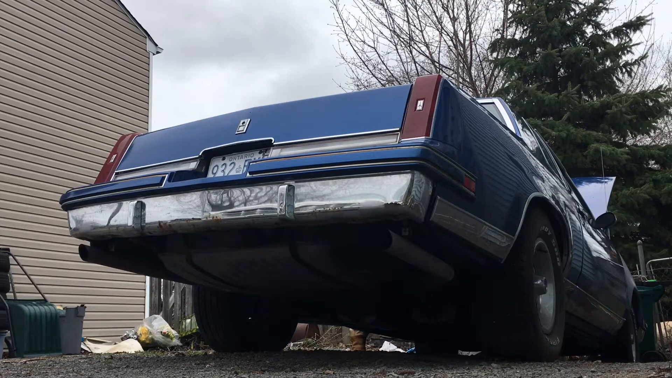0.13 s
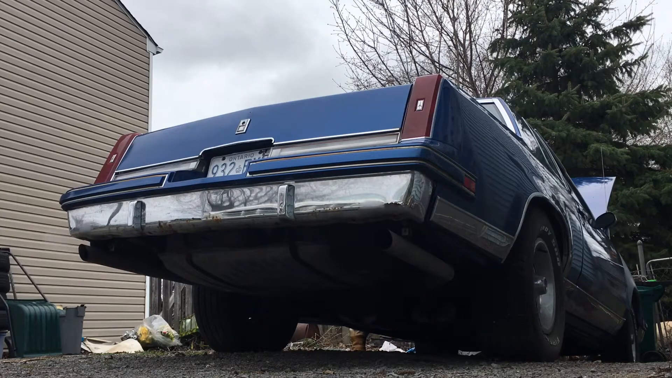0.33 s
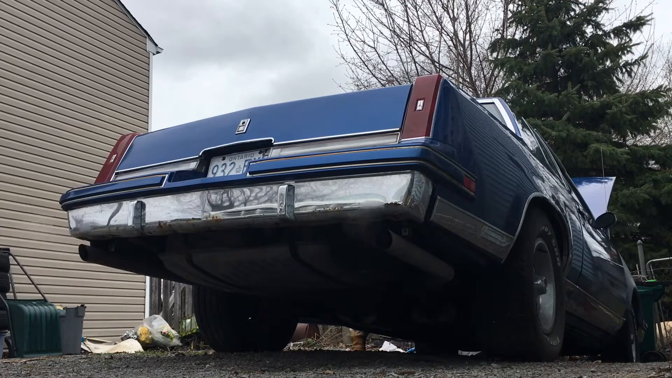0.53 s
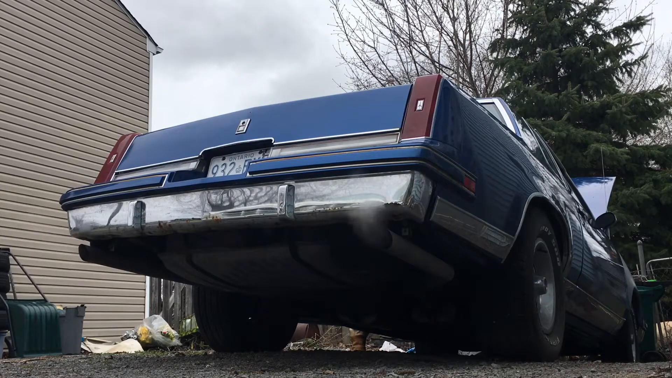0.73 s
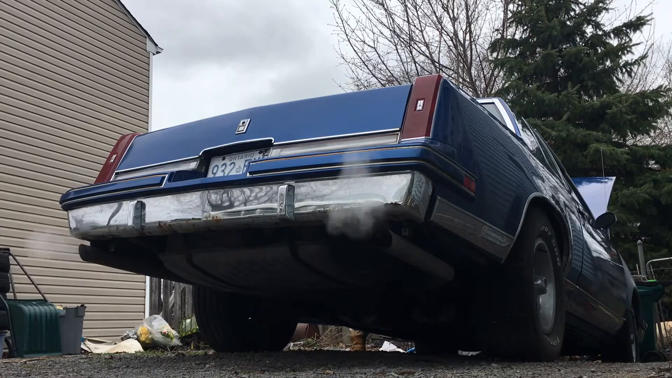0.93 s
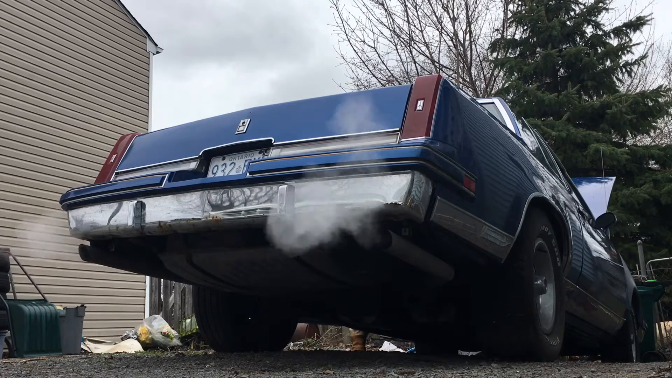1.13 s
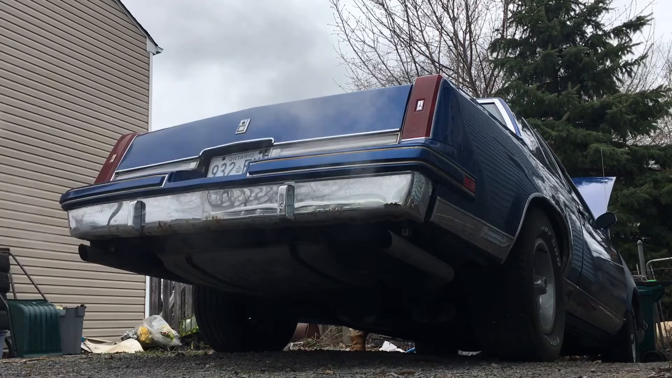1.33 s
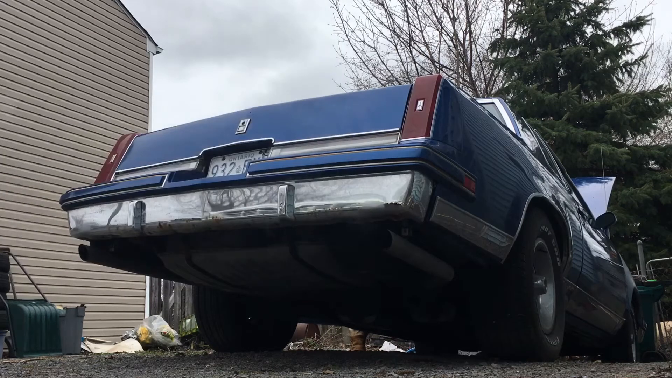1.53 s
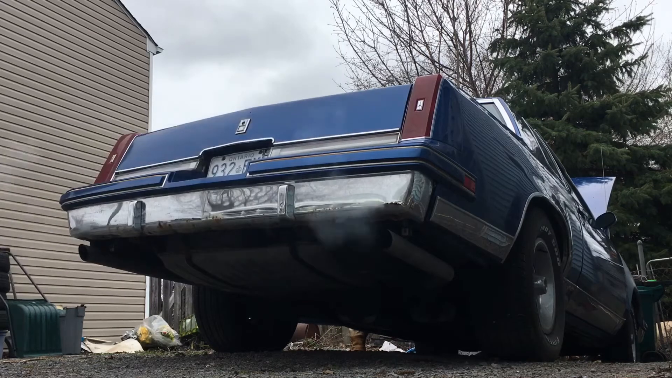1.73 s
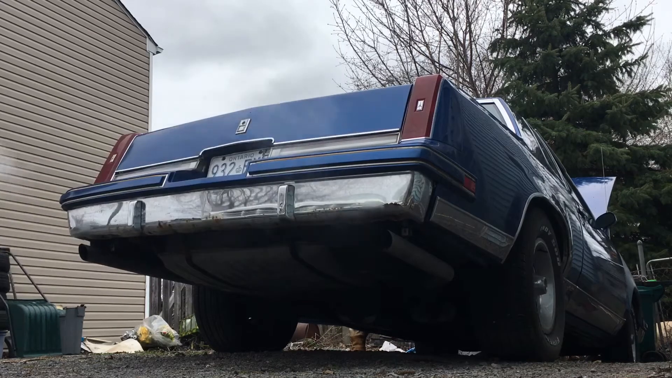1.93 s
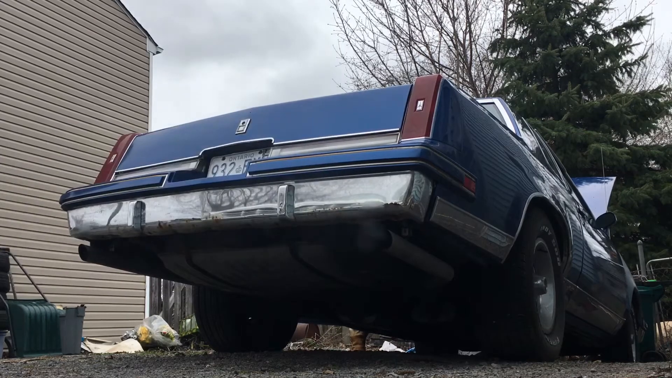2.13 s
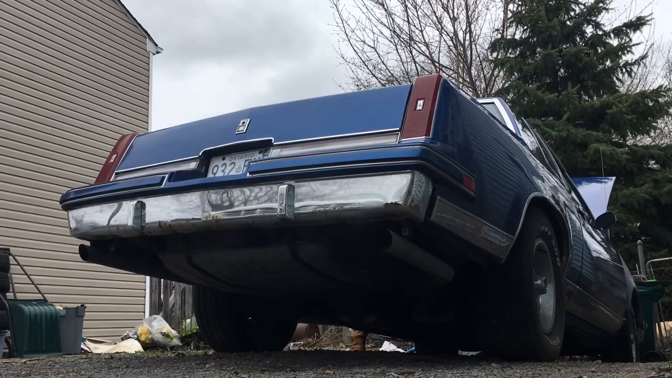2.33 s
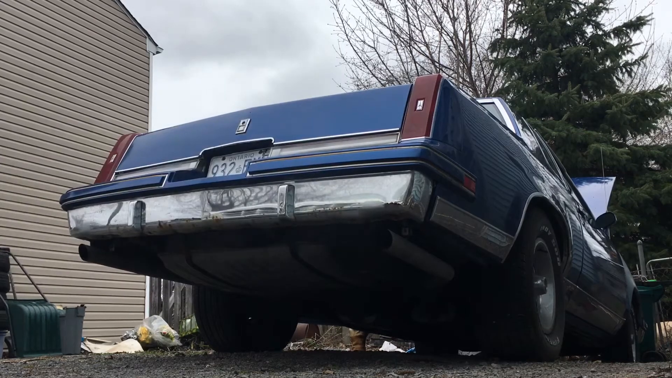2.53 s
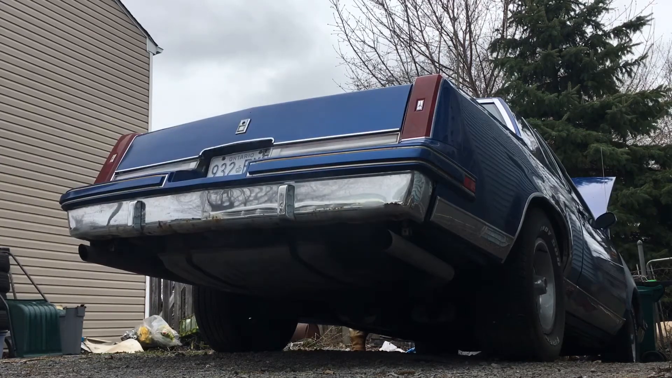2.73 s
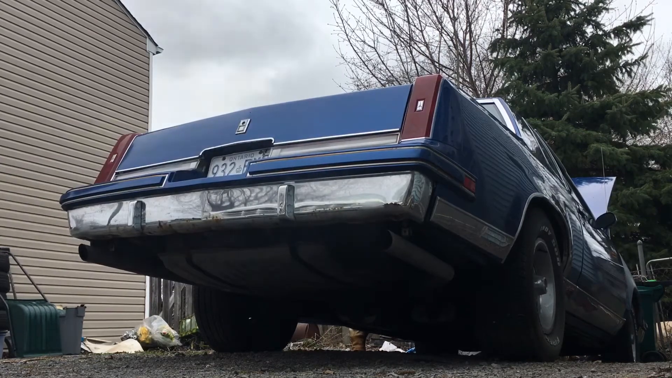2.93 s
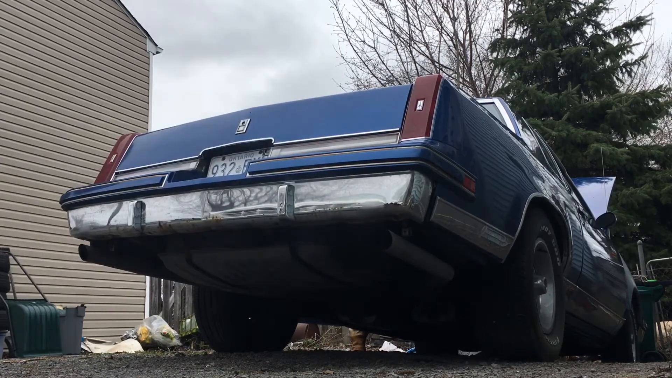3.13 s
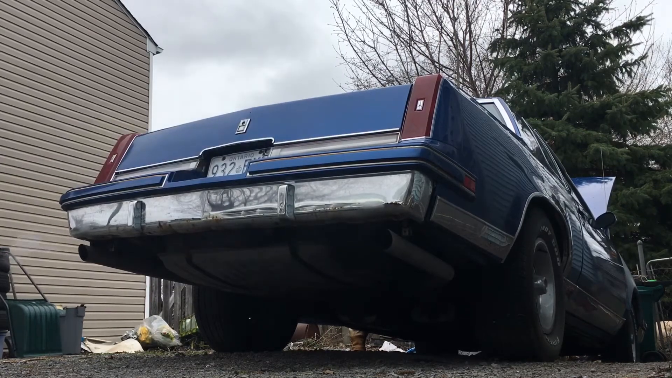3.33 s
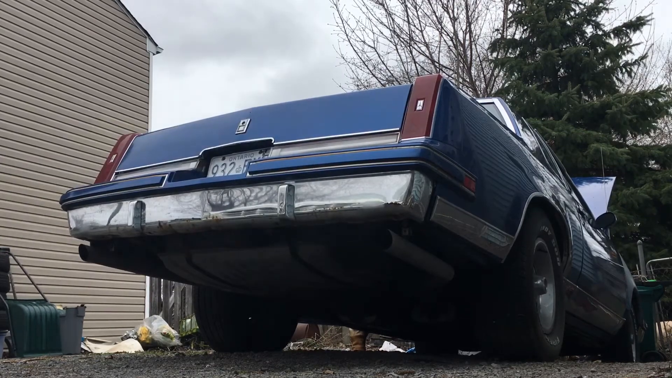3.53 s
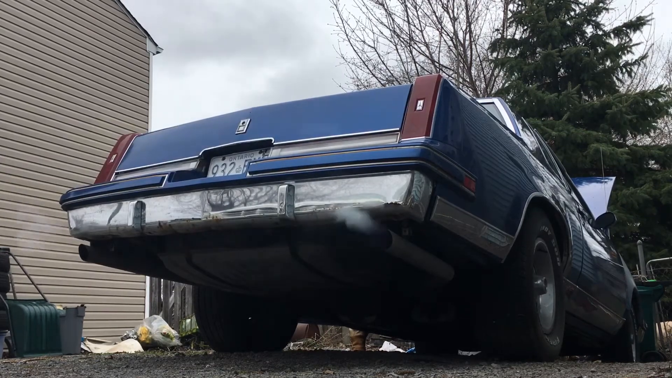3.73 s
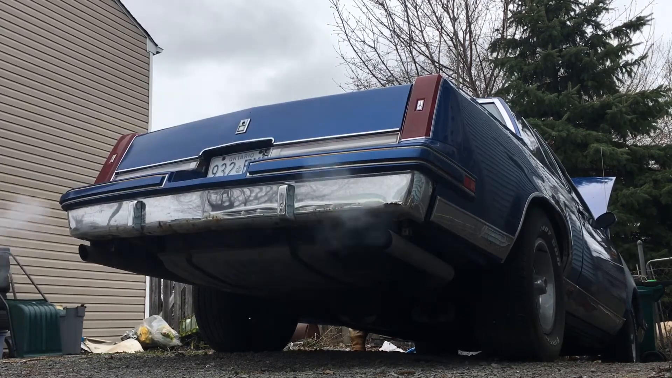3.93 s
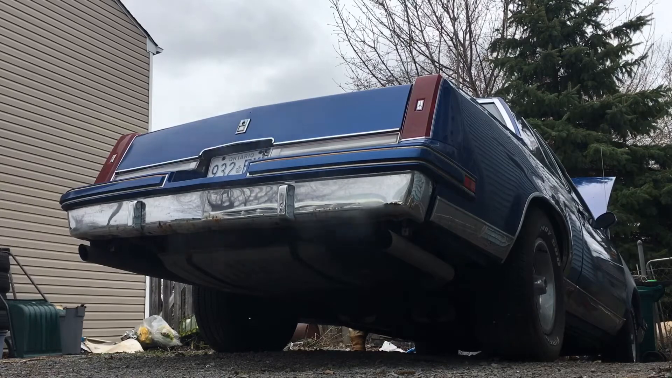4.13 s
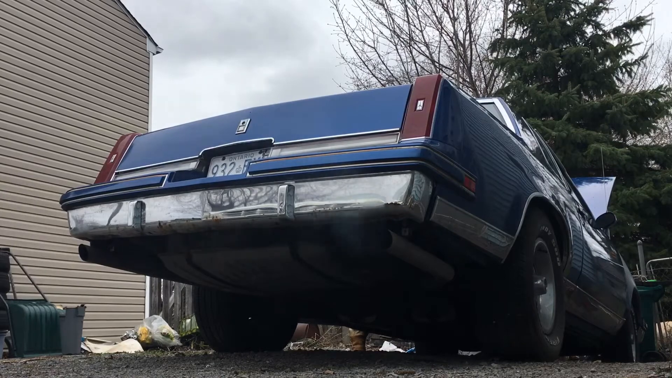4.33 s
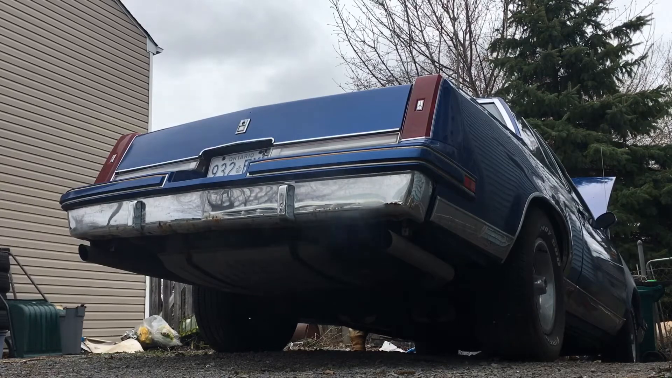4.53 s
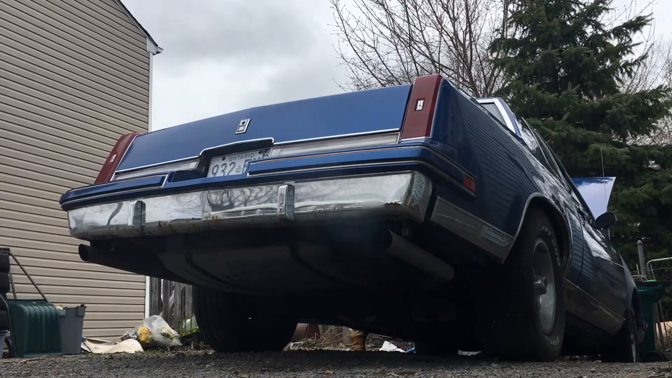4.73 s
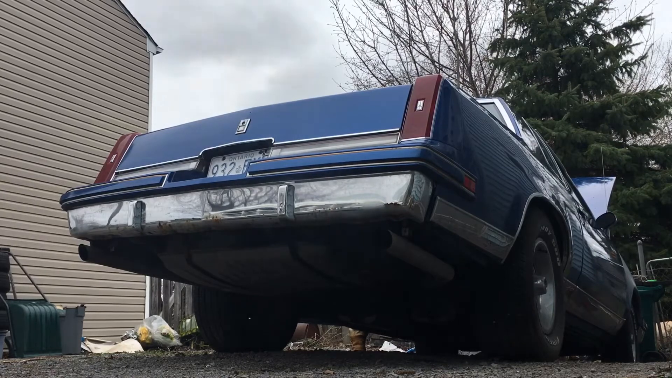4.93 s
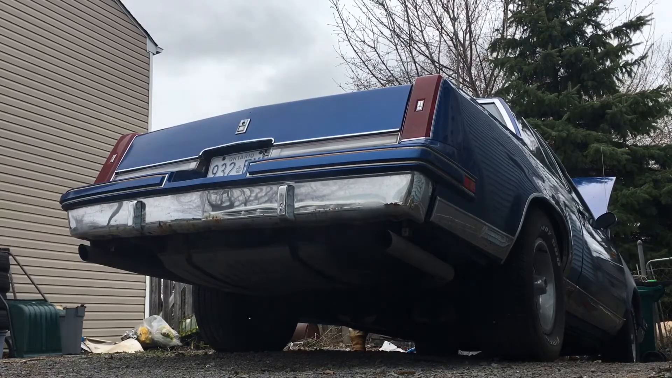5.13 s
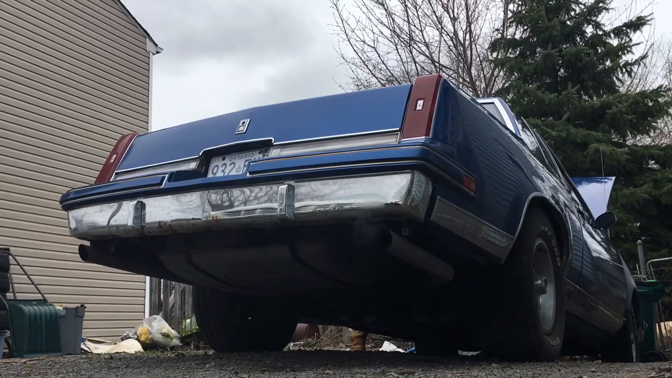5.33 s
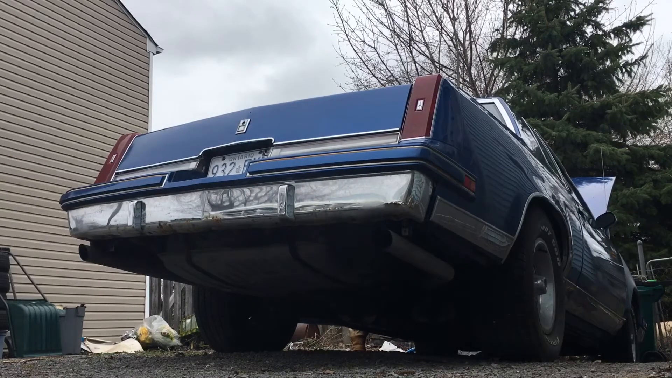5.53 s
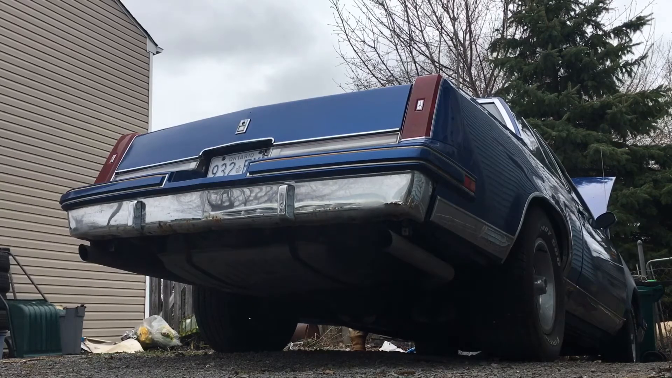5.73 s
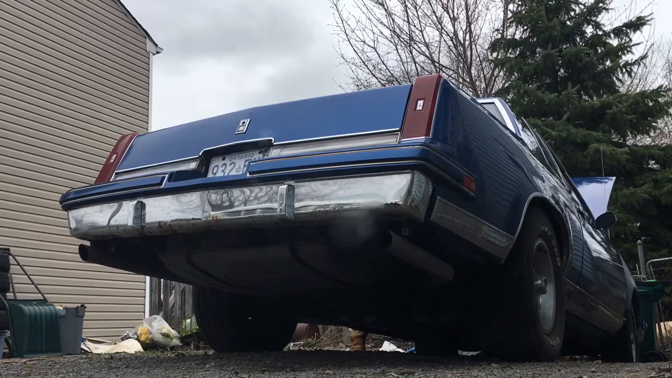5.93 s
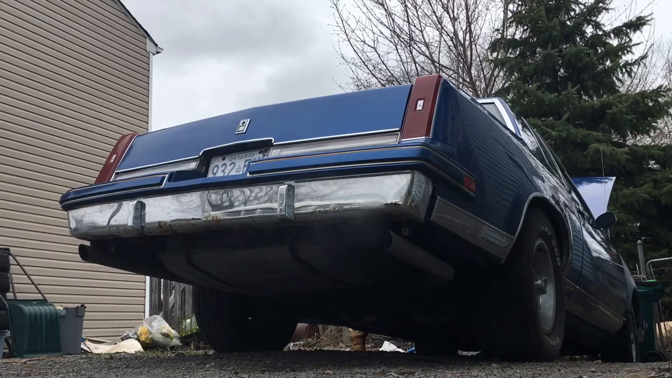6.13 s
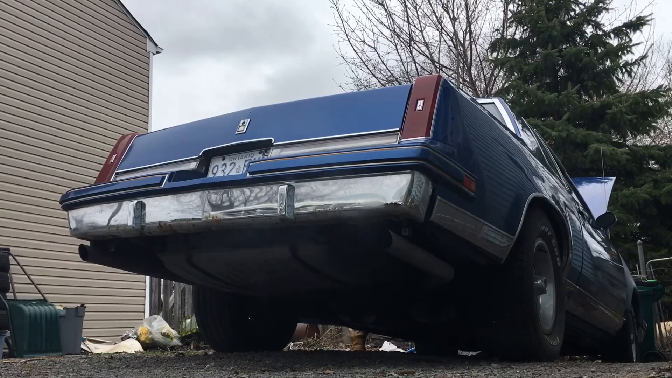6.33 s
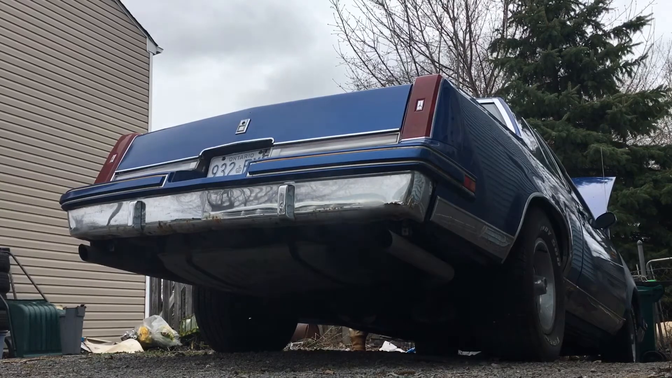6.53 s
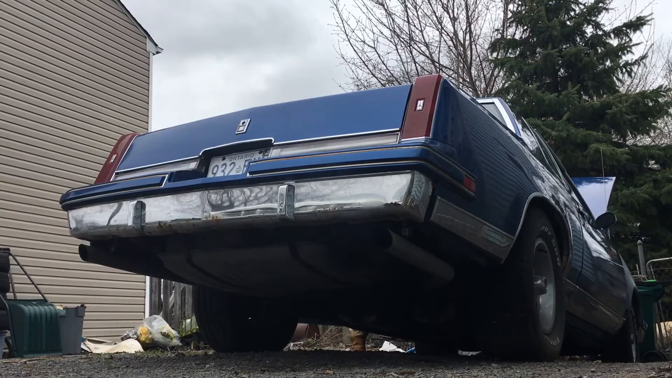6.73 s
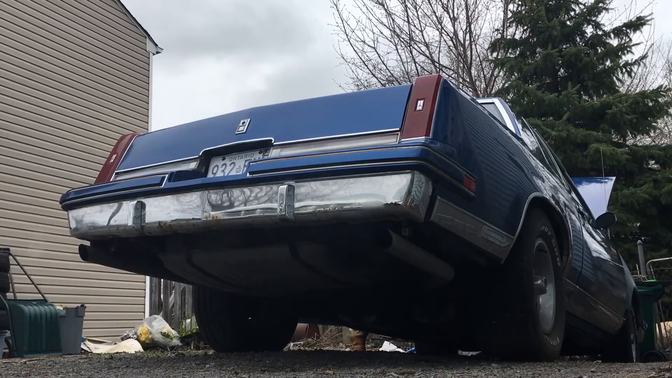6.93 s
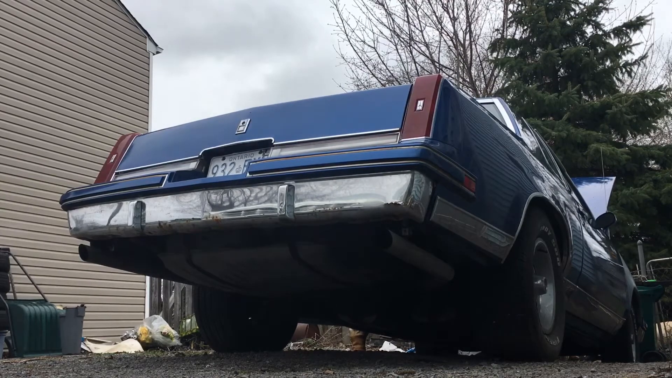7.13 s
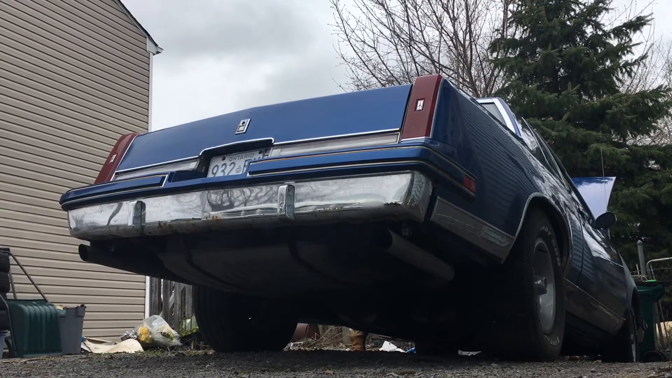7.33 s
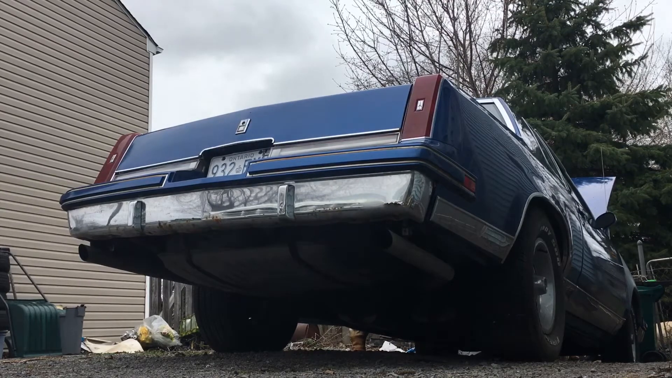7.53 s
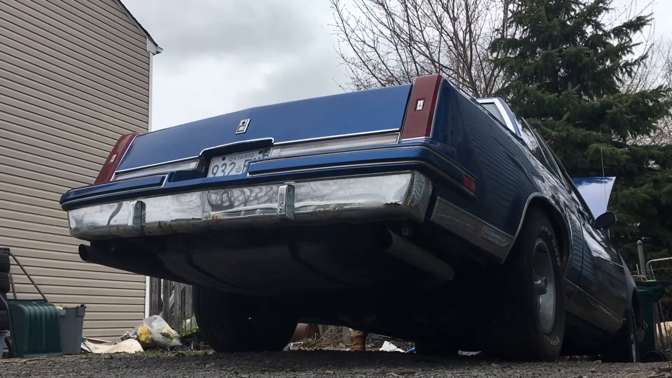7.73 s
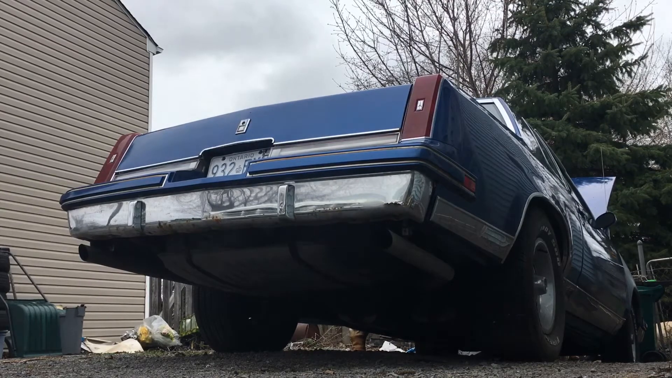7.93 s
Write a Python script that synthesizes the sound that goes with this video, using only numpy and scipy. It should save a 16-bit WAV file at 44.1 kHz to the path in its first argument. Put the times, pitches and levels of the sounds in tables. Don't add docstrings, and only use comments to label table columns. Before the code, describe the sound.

A starter whines and chuffs, then a big open-piped V8 catches with a roar, is blipped several times, crackles and settles into a rough lope.

```python
import sys
import numpy as np
from scipy import signal
from scipy.fft import rfft, irfft
from scipy.io import wavfile
from scipy.ndimage import uniform_filter1d

SR = 44100
rng = np.random.default_rng(int(sys.argv[2]) if len(sys.argv) > 2 else 0)


def log_audio(samples):
    frames = np.atleast_2d(samples).T
    limited = np.clip(frames, -1, 1)
    pcm = np.round(limited * 32767).astype(np.int16)
    wavfile.write(sys.argv[1], SR, pcm)


def magnitude_from_level(level_db):
    exponent = np.asarray(level_db, float) / 20
    return 10 ** exponent


N = 352800
TIME_S = np.arange(N) / SR
CATCH_S, STARTER_OFF_S = 1.13, 1.4
QUIET_DB = -42.5


def level(x, db=0):
    return x * magnitude_from_level(db) / np.sqrt(np.mean(x ** 2))


def columns(table):
    s, *cols = np.transpose(table)
    return [np.interp(TIME_S, s, c) for c in cols]


def ring(x, modes):
    return sum(magnitude_from_level(db) * signal.lfilter(*signal.iirpeak(hz, hz / width, fs=SR), x)
               for hz, width, db in modes)


def colour(x, spectrum):
    hz, db = np.transpose(spectrum)
    f = np.arange(N // 2 + 1) * SR / N + 1
    return irfft(rfft(x) * magnitude_from_level(np.interp(np.log(f), np.log(hz), db)), N)


def band(x, lo_hz, hi_hz):
    return signal.sosfilt(signal.butter(2, [lo_hz, hi_hz], "bandpass", fs=SR, output="sos"), x)


def fade(x, s):
    return signal.lfilter([1], [1, -np.exp(-1 / (s * SR))], x)


def train(times, sizes):
    out = np.zeros(N)
    np.add.at(out, np.clip((np.asarray(times) * SR).astype(int), 0, N - 1), sizes)
    return out


def noise():
    return rng.standard_normal(N)


def bumps(rows):
    return sum(size * np.exp(-((TIME_S - s) / length) ** 2) for s, size, length in rows)


def engine():
    boom_db, bark_db, rasp_db, jet_db = levels()
    flutter_db = 1.7 * level(band(noise(), 6.1, 43.5))
    rasp_db, jet_db = rasp_db + flutter_db, jet_db + flutter_db
    running = np.clip((TIME_S - CATCH_S) / 0.1, 0, 1)
    push, front = firings(jitter_s=.00008, far_db=-8., far_s=.0033)
    throttle = np.clip((rasp_db + 42) / 18, 0, 1)
    spurt = np.maximum(throttle, .3) * level(fade(front, .0015))
    pipes = magnitude_from_level(boom_db) * (boom(push, front) + thuds()) + magnitude_from_level(bark_db) * bark(front)
    gas = magnitude_from_level(rasp_db) * (rasp(spurt) + tear(throttle, spurt)) + magnitude_from_level(jet_db) * jet(throttle, front)
    return running * (pipes + gas)


# bank, charge_db, manifold_travel_ms
CYLINDERS = [(0, 1.5, .8), (1, 1, .3), (1, 1.2, -.4), (0, -.2, 0), (1, -1, .6), (0, -1, 1.6),
             (0, -1.6, -.8), (1, .2, -.2)]


def firings(jitter_s, far_db, far_s):
    hz, scatter_db = crank()
    at = np.flatnonzero(np.diff(np.floor(np.cumsum(len(CYLINDERS) * hz / SR))))
    bank, charge_db, travel_ms = np.array(CYLINDERS)[np.arange(len(at)) % len(CYLINDERS)].T
    chance = rng.standard_normal((N // 100, 2))[:len(at)].T * scatter_db[at]
    sizes = magnitude_from_level(charge_db + bank * far_db + chance[0]) / np.sqrt(hz[at])
    times = at / SR + bank * far_s + jitter_s * chance[1]
    return level(train(times, sizes)), level(train(times + travel_ms / 1e3, sizes))


# pitch_hz, width_hz, level_db
BOOM = [(48, 30, -17), (72, 36, -11), (108, 26, 0), (185, 40, -21)]


def boom(push, front):
    low = level(sum(ring(ring(-push, [mode]), [mode[:2] + (0,)]) for mode in BOOM))
    low = low + level(ring(ring(-front, [(199.4, 75, 0)]), [(196.5, 94, 0)]), -7.5)
    return low - .8 * ring(low, [(152, 40, 0)])


# centre_s, strength, length_s
THUDS = [
    (1.27, 1.3, 0.22),
    (1.62, 0.5, .04),
    (2.05, 0.7, 0.1),
    (4.96, .6, 0.036),
    (5.11, 1, 0.085),
    (7.9, 0.46, .1),
]


def thuds():
    return bumps(THUDS) * level(band(noise(), 47, 110), 0.5)


# pitch_hz, width_hz, level_db
BARK = [(221.5, 60, -3), (239.5, 98, -5), (283, 15.6, -5), (310.4, 14.2, 1.1), (421, 49.5, -3),
        (523, 33, -6.5), (624.5, 48, 1), (756, 22, -6.5), (885, 89, -15)]


def bark(front):
    gas = .24 * (.8 + level(fade(front, .004))) * noise()
    soft = signal.lfilter(*signal.butter(2, 450, fs=SR), front)
    return level(band(band(ring(gas - soft, BARK), 175, 1100), 150, 1200))


# pitch_hz, width_hz, level_db
RASP = [(1280, 170, -21), (2273, 455, 15), (2456, 320, 11), (2570, 110, 1), (3870, 900, -37),
        (4070, 710, -30)]


def rasp(spurt):
    return level(band(ring((1.74 + spurt) * noise(), RASP), 1070, 3750), -1.0)


# pitch_hz, width_hz, level_db
TEAR = [(990, 490, 1), (3363, 1500, 0)]


def tear(throttle, spurt):
    strength = throttle ** 1.9 * np.clip(crank()[0] / 23.5, 0, 1) ** 2
    return strength * level(band(ring((0.63 + spurt) * noise(), TEAR), 630, 2930), 0.1)


# pitch_hz, level_db
JET = [(3180, -15), (5400, -6.5), (5730, -4), (7220, -8.5), (9190, -6), (10300, -10.5), (14400, -13.5),
       (16000, -35)]


def jet(throttle, front):
    pulse = 0.63 * throttle * level(fade(front, 0.00041))
    return level(colour((8.5 + pulse) * noise(), JET), -5.0)


# time_s, speed_hz, firing_scatter_db
IDLE = [(1.13, 7.5, 4), (1.7, 12.8, 2.6), (2.68, 14, 2.3), (4.05, 12, 2.3), (4.2, 11.6, .8),
        (4.7, 11.8, .8), (5.9, 14.8, 1.8), (6.2, 14.4, .65), (7.08, 14.2, .65), (7.5, 12.3, 1.6),
        (8, 9.9, 2.2)]
# open_s, shut_s, top_speed_hz, coasting_loss_per_s, climbing_scatter_db
BLIPS = [
    (1.13, 1.5, 19, 1.45, 3.5),
    (1.87, 2.09, 30, 1.5, 3.2),
    (2.72, 3.17, 36.5, 1.34, 1.3),
    (4.82, 5.24, 36.8, 1.23, 2.2),
]


def crank():
    flywheel_s, coast_scatter_db = .05, 1.4
    hz, scatter_db = columns(IDLE)
    for open_s, shut_s, top_hz, loss, climb_db in BLIPS:
        climb = np.interp(TIME_S, [open_s, shut_s], [hz[int(open_s * SR)], top_hz])
        coast = top_hz * np.exp(-loss * (TIME_S - shut_s))
        blip = np.where(TIME_S < shut_s, climb * (TIME_S > open_s), coast)
        steady_db = np.where(TIME_S < shut_s, climb_db, coast_scatter_db)
        scatter_db = np.where(blip > 1.2 * hz, steady_db, scatter_db)
        hz = np.maximum(hz, blip)
    return uniform_filter1d(hz, int(flywheel_s * SR)), scatter_db


# time_s, rasp_db
BREATHING = [(1.13, -38), (1.6, -41), (1.85, -39.5), (2.25, -35), (2.6, -48), (2.75, -33), (3.55, -38.5),
             (3.78, -47), (4.09, -41.5), (4.16, -38.5), (4.75, -34.5), (5.7, -37.5), (5.85, -41.5),
             (6.83, -36), (7.3, -39.5), (8, -38.5)]
# start_s, rise_s, end_s, rasp_db, sag_db_per_s
ROARS = [
    (1.16, .02, 1.3, -23, -20),
    (1.15, 0.15, 1.44, -18, 24),
    (1.839, 0.18, 2.1, -20, 11),
    (2.64, .03, 2.61, -33.5, 20),
    (2.738, 0.094, 3.17, -25, -12),
    (3.1, 0.095, 3.47, -26, 13.5),
    (4.72, 0.23, 5.22, -21.5, -3.5),
    (5.24, 0.029, 5.53, -23, 26.5),
]


def flow():
    release_s = 0.09
    roars = []
    for start, rise, end, db, sag in ROARS:
        hold_s = end - start - rise
        corners = np.cumsum([start, rise, max(hold_s, .01), release_s])
        roars.append(np.interp(TIME_S, corners, [QUIET_DB, db, db - sag * hold_s, QUIET_DB]))
    return np.maximum(columns(BREATHING)[0], np.max(roars, axis=0))


# centre_s, boom_change_db, length_s
SURGES = [(1.657, -1, 0.038), (1.734, 11, 0.035), (1.838, -8.5, 0.18), (1.941, 9.5, 0.025),
          (2.494, 10, .04), (2.58, -4, 0.12), (2.672, 6.5, 0.0067), (3.196, -9.5, 0.039),
          (3.534, 3.5, 0.054), (3.764, -3.5, 0.053), (3.88, -6.5, 0.0079), (4.036, -5, 0.076),
          (4.16, 6.5, .03), (4.687, 3.5, 0.041), (4.84, 7.5, 0.041), (4.967, 9, 0.022), (5.1, 3.5, 0.013),
          (5.181, -2, 0.032), (5.265, -16, 0.018), (5.63, 6, 0.061), (5.676, -16, 0.025), (5.75, 1, 0.044),
          (6.3, -2, 0.13), (3.12, -3, 0.027), (7.5, 0, .08), (2.02, -4.5, 0.046), (7.632, 3, 0.026),
          (7.769, 3.5, 0.052), (7.856, -7, 0.028), (7.968, 3, 0.01)]


def levels():
    surge, sway = bumps(SURGES), lope()
    rasp_db = flow()
    above = rasp_db + 40
    boom_db = -16 + 0.18 * above + surge + sway
    bark_db = -26.5 + 0.89 * above + sway / 2 + 0.39 * surge
    jet_db = -54 + 1.21 * above + 0.32 * surge
    return boom_db, bark_db, rasp_db + 0.32 * surge, jet_db


def lope():
    gone_hz, db_per_hz, peak_s = 18.5, .6, 4.175
    hz = crank()[0]
    cycles = np.cumsum(hz / SR)
    depth_db = db_per_hz * np.clip(gone_hz - hz, 0, None)
    return depth_db * np.cos(2 * np.pi * (cycles - cycles[int(peak_s * SR)]))


# start_s, peak_db
CRACKS = [(1.1773, -23), (1.2122, -29), (1.455, -19), (1.976, -26), (2.0298, -9), (2.0633, -6),
          (2.1022, -11), (2.1381, -16), (2.817, -29), (2.85, -26), (2.8844, -16), (2.9263, -19),
          (2.9642, -18), (3.0076, -15), (3.04, -16), (3.0635, -10), (3.0929, -10), (3.2002, -24),
          (3.2291, -20), (3.2915, -21), (4.9537, -7), (4.9901, -14), (5.0335, -9), (5.0714, -8),
          (5.1068, -4), (5.1383, -9), (5.1677, -10), (5.1961, -15), (5.3343, -18), (5.3653, -17)]


def cracks():
    ticks_per_s, tick_db = 5, -5
    when, size = rng.random((int(ticks_per_s * N / SR), 2)).T
    when = CATCH_S + when * (N / SR - CATCH_S)
    tick_peak_db = flow()[(when * SR).astype(int)] + tick_db - 6 * size
    s, peak_db = np.c_[np.transpose(CRACKS), [when, tick_peak_db]]
    body_db = np.minimum(-11.5 + .4 * peak_db, peak_db + 7)
    top = fade(train(s, magnitude_from_level(peak_db)), .0005) * level(colour(noise(), JET), 1)
    body = fade(train(s, magnitude_from_level(body_db)), .001) * level(band(noise(), 2500, 4900), -4.5)
    return top + body + magnitude_from_level(-5) * np.roll(top + body, int(.0083 * SR))


# start_s, peak_db
POPS = [(1.58, -30), (2.328, -13), (2.622, -24), (2.654, -16), (2.849, -4), (2.926, 0), (2.974, -3.5),
        (3.006, -0.5), (3.229, 6.5), (3.454, -6.5), (3.578, -17.5), (3.854, -18.5), (3.894, -19.5),
        (4.531, -10.5), (4.56, -15.5), (5.491, -7), (5.562, -6), (5.732, -17.5), (5.755, -15), (5.796, -22),
        (5.951, -33.5), (5.993, -33), (6.124, -12.5), (6.271, -26), (6.332, -31), (6.658, -20)]


def pops():
    s, peak_db = np.transpose(POPS)
    spit = fade(train(s, magnitude_from_level(peak_db)), 0.0037) * noise()
    dull = band(ring(spit, BARK), 426, 1200)
    bright = band(band(spit, 2200, 3230), 1770, 3500)
    return magnitude_from_level(11.5) * dull + magnitude_from_level(-4.0) * bright


# pitch_hz, level_db
GRIND = [(120, -57), (200, -29), (512, -7.5), (570, -26), (659, -16), (912, -5.5), (1360, -7),
         (2290, -13.5), (3170, -19), (5860, -25), (15000, -45.5)]


def starter():
    mesh_hz, whine_db, grind_db = strokes()
    engage = np.clip((TIME_S - CHUFFS[0][0]) / 0.019 + 1, 0, 1) ** 3
    on = engage * np.clip((STARTER_OFF_S - TIME_S) / 0.023, 0, 1)
    wobble = level(band(noise(), 20, 90))
    turn = np.cumsum(2 * np.pi * mesh_hz / SR) + .45 * wobble
    half_turn = magnitude_from_level(-4.5) * (1 + 0.5 * wobble) * np.sin(turn / 2)
    whine = np.sqrt(2) * (np.sin(turn) + half_turn)
    grind = colour(noise(), GRIND)
    grind = grind / np.std(band(grind, 1600, 9000))
    return on * (magnitude_from_level(whine_db) * whine + magnitude_from_level(grind_db - 0.54) * grind)


# start_s, fastest_mesh_hz, whine_db
STROKES = [
    (.188, 1300, -31),
    (0.272, 1295, -33),
    (0.356, 1310, -30.5),
    (0.492, 1420, -33),
    (0.633, 1355, -30.5),
    (.76, 1413, -32),
    (0.8568, 1394, -32),
    (.964, 1450, -30.5),
    (1.083, 1330, -38.5),
]


def strokes():
    labour_hz, dip_db = 1195, 16
    s, top_hz, top_db = np.transpose(STROKES + [(STARTER_OFF_S, labour_hz, QUIET_DB)])
    turn = np.interp(TIME_S, s, np.arange(len(s)))
    k = np.floor(turn).astype(int)
    arch = np.sin(np.pi * (turn % 1) ** 0.575)
    patchy_db = 3.5 * level(band(noise(), 10.5, 40))
    slam_db = 14.5 * np.exp(-np.abs(TIME_S - s[0]) / 0.041)
    stroke_db = 6 * np.exp(-np.abs(TIME_S - s[k]) / 0.09)
    mesh_hz = labour_hz + (top_hz[k] - labour_hz) * arch
    return mesh_hz, top_db[k] - dip_db * (1 - arch) + patchy_db, -41.5 + slam_db + stroke_db


# start_s, hiss_peak_db, thump_over_hiss_db
CHUFFS = [
    (0.19, -15.5, -14),
    (0.3686, -35.5, 3),
    (0.508, -31, 1.5),
    (0.634, -24.5, 3),
    (0.7535, -23.5, 0.5),
    (0.8592, -22, -0.5),
    (0.965, -21.5, 1),
    (1.0817, -20, -1.5),
]
# start_s, hiss_peak_db, thump_over_hiss_db
LURCH = (0.2178, -55, 36.6)


def chuffs():
    s, hiss_db, thump_db = np.transpose(CHUFFS + [LURCH])
    hiss = fade(train(s, magnitude_from_level(hiss_db)), 0.022) * level(band(noise(), 1800, 7100), -13.0)
    blow = train(s, magnitude_from_level(hiss_db + thump_db))
    push = fade(blow, 0.061) * noise()
    thump = ring(ring(blow, [(134.8, 5.4, 62.6)]), [(132, 53, 0.017)])
    breath = band(ring(push, [(82, 26.4, -8.5), (253, 30, -16.5), (602, 14, -14.)]), 78, 1200)
    return hiss + thump + magnitude_from_level(28.0) * breath


def wall(car):
    scatter = np.exp(-np.arange(SR // 4) / (0.027 * SR)) * noise()[:SR // 4]
    back = signal.fftconvolve(car, scatter)[:N]
    return np.r_[np.zeros(SR // 80), level(back) * np.std(car)][:N]


# pitch_hz, level_db
YARD = [(15, -27), (25, 1), (49, 9.5), (93, -2.5), (318, -16.5), (604, -25), (655, -17), (2070, -32.5),
        (15000, -58)]


def yard():
    return level(colour(noise(), YARD), -43.5)


def scene():
    car = engine() + cracks() + pops() + starter() + chuffs()
    return (car + magnitude_from_level(-13.) * wall(car) + yard())[None]


def low_pass(x):
    return signal.sosfilt(signal.butter(12, 16520, fs=SR, output="sos"), x)


def record(dry):
    mix = np.tanh(1.216 * dry) / 1.07
    return low_pass(mix)


dry = scene()
out = record(dry)
log_audio(out)
```